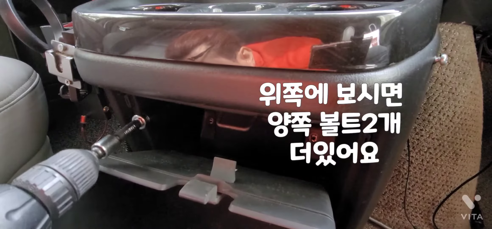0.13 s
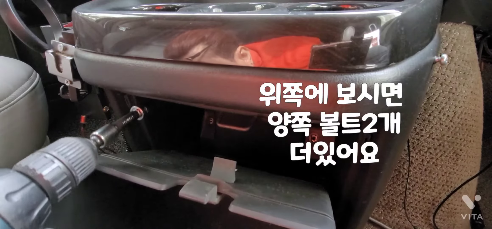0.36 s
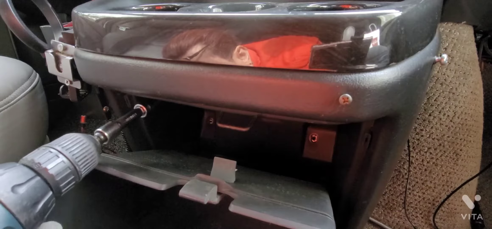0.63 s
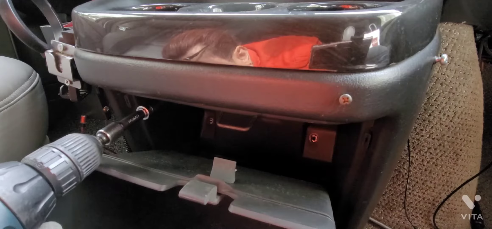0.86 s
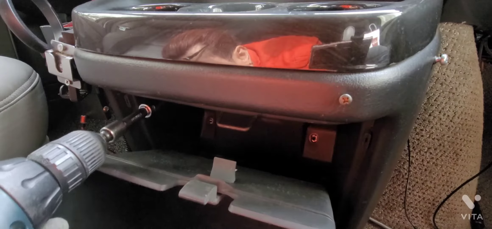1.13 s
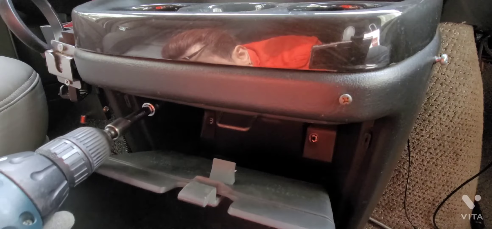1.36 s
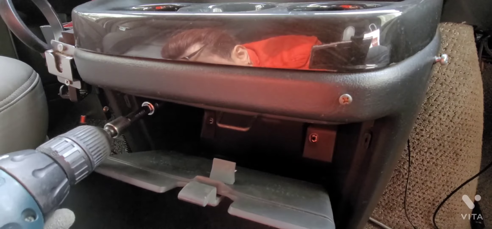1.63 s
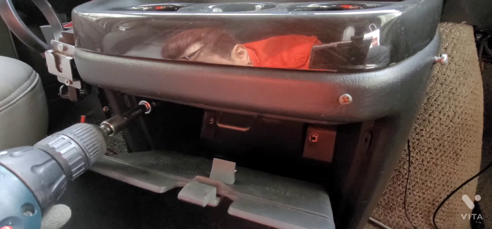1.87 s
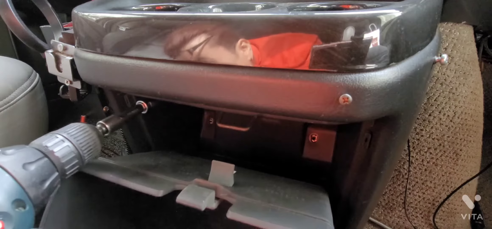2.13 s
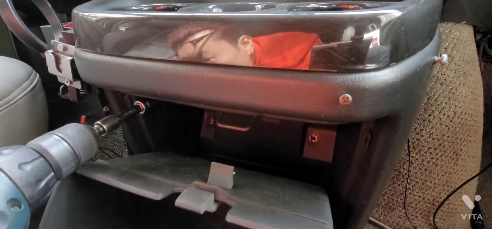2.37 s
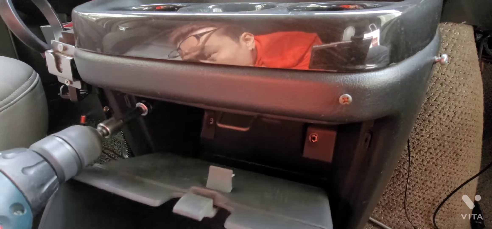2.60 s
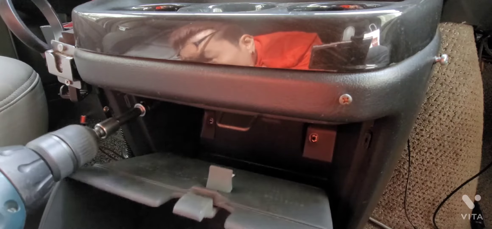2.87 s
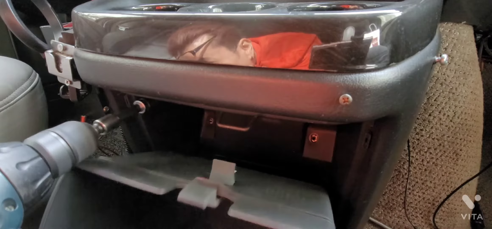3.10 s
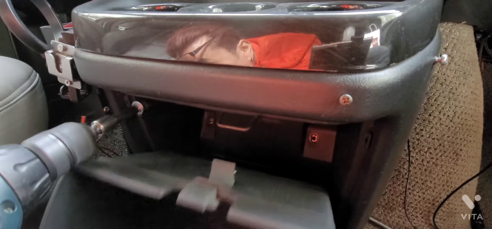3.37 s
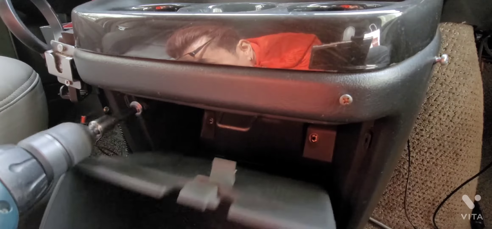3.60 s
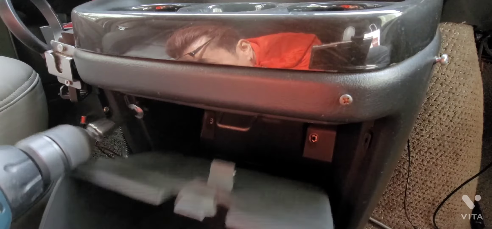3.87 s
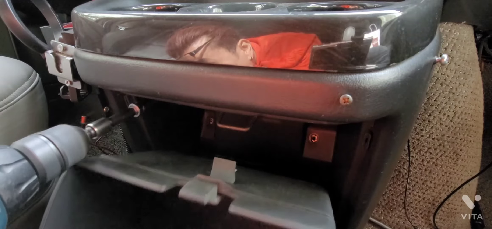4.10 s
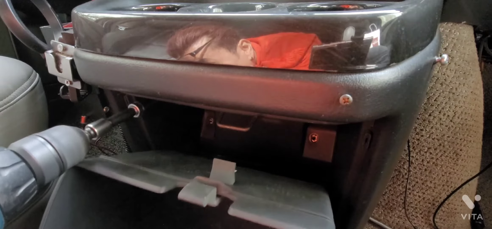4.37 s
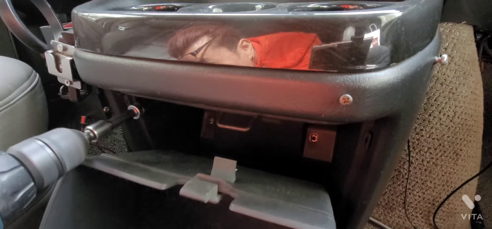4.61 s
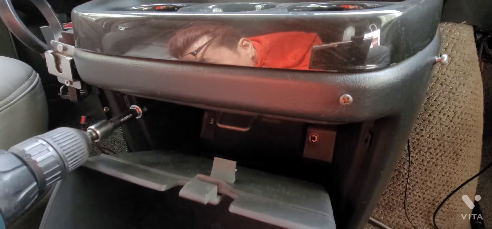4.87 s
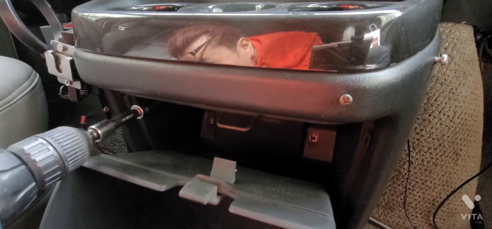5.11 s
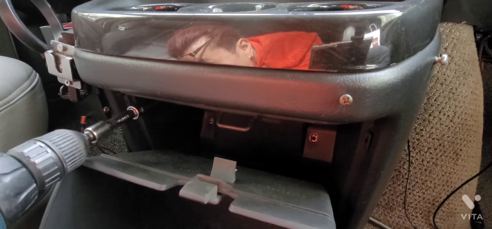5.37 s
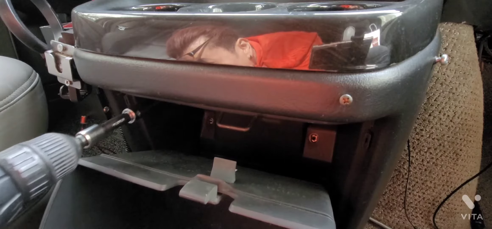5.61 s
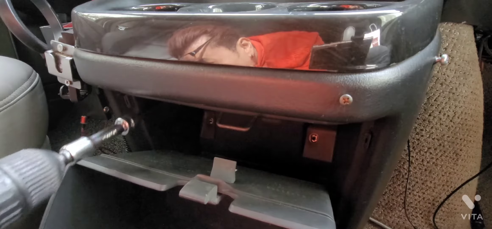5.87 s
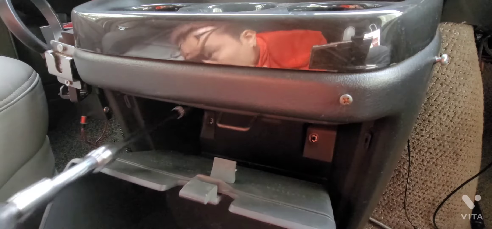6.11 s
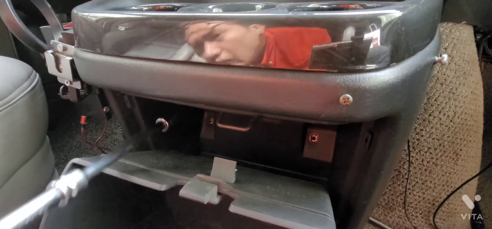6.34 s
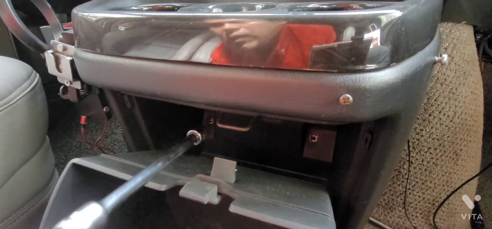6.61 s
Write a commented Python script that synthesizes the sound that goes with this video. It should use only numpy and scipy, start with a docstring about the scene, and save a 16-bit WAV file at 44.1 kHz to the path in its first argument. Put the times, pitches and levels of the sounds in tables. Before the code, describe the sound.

Close and mostly left-sided, in a small dry car footwell: hands and tool scrape and tap hollow plastic. A short drill burst and a longer one follow, with brushy motor whir, gear whine, socket rattle and dash buzz, the longer one ending in heavy bumps and a quick downward groan. Small taps, then a tight run of the loudest trim knocks, settle to a quiet wash.

```python
"""In a vehicle footwell a cordless drill backs out a bolt in two bursts, close to two microphones.
Motor whir and gear tones radiate through the air; the socket's grips on the bolt pass rotor shake
and chatter into the plastic dash, and a falling tone marks each release.
Knocks ring the dash and trim, hands and tool drag on the trim as trains of small slips,
and a wavering low hum lies under a quiet wash."""
import sys
import numpy as np
from scipy import signal
from scipy.fft import rfft, irfft
from scipy.io import wavfile
from scipy.ndimage import uniform_filter1d

SR = 44100
rng = np.random.default_rng(int(sys.argv[2]) if len(sys.argv) > 2 else 0)


def transcribe(signal):
    """Save signal, clipped to [-1, 1], as a 16-bit WAV file at the path in sys.argv[1]."""
    frames = np.atleast_2d(signal).T
    limited = np.clip(frames, -1, 1)
    pcm = np.round(limited * 32767).astype(np.int16)
    wavfile.write(sys.argv[1], SR, pcm)


def rack_gain(trim_db):
    """Turn a fader trim in dB into the linear factor to multiply a signal by."""
    fader = np.asarray(trim_db, float)
    return 10 ** (fader / 20)


N = 296780

# Motor speed before the knocks slow it: (time [s], speed [turns/s])
MOTOR_SPEED = [(2.45, 20), (2.56, 110), (2.62, 190), (2.7, 260), (2.76, 290), (2.88, 40), (3.03, 160),
               (3.1, 228), (3.2, 268), (3.3, 289), (3.45, 304), (3.6, 308), (4.08, 309), (4.15, 315),
               (4.3, 318), (4.45, 323), (4.6, 325), (4.72, 325), (4.8, 290), (4.95, 60)]
# Relative level of the fan, brush and gear whir over two trigger pulls: (time [s], level [dB])
WHIR_LEVEL = [(2.44, -56), (2.469, -33), (2.5, -34), (2.54, -25), (2.58, -25), (2.68, -24), (2.79, -28),
              (2.9, -60.5), (2.93, -47.5), (2.99, -24.5), (3.08, -26.5), (3.14, -23.5), (3.2, -27.5),
              (4.5, -28.5), (4.6, -28), (4.76, -28.5), (4.81, -26), (4.86, -38), (4.98, -73)]


def drill():
    """Superposition: airborne whir, structure-borne bolt vibration and body rumble add linearly."""
    speed = curves([MOTOR_SPEED], outside=0)[0] * (1 - snags())
    turns = 2 * np.pi * np.cumsum(speed * (1 + 0.00076 * wander(38))) / SR  # phase [rad]
    whir_db = curves([WHIR_LEVEL])[0]
    whir = rack_gain(whir_db + 1) * motor_whir(turns, speed / speed.max())
    near = whir + bolt_vibration(turns, whir_db) + brakes()
    return ports(near, 0.68, 0.000483) + ports(body_rumble(whir_db), 0.73, 0.0002)


# Spectrum of the whir: (frequency [Hz], relative density [dB per Hz])
WHIR_SPECTRUM = [(410, -45), (700, -2), (1020, -12), (1690, -3), (2530, -7), (2910, -9.5), (3270, -7.5),
                 (4890, -15.5), (8430, -13.5), (9720, -15.5), (12400, -12), (14500, -17.5), (15500, -21.5)]
# Gear tones: (multiple of motor speed [1], level against the whir at full speed [dB])
GEAR_TONES = [(5, -24), (6, -21), (7, -22), (8, -24), (10, -25), (15, -24), (18, -11), (39.6, -23)]
# Resonances of the drill's shell: (frequency [Hz], width [Hz], relative level [dB])
SHELL_MODES = [(1320, 160, -4.5), (1569, 17, -2.5), (1974, 120, 2), (2465, 87, 2.5), (3316, 160, -3.5),
               (3695, 60, -13)]


def motor_whir(turns, full):
    """Amplitude modulation: noise throbs once a turn, with tones at multiples of the rotation."""
    air = pair(rng.standard_normal(N), rng.standard_normal((2, N)), 0.43)
    # brushes and fan blades throb; gear teeth tick
    hiss = air * (1 + 0.15 * np.cos(turns)) + 0.12 * jolts(540, 3)
    whir = patchy(colour(hiss, WHIR_SPECTRUM), 2.62) * rack_gain(1.5 * wander(67))
    low_pass = signal.butter(2, 7000, fs=SR, output="sos")
    body = signal.sosfiltfilt(low_pass, whir)
    # the fan brightens the top as the speed rises
    whir = body + (0.12 + 1.34 * full ** 2) * (whir - body)
    gears = sum(rack_gain(db + 3 * wander(15)) * np.cos(k * turns) for k, db in GEAR_TONES)
    whir += full ** 5 * gears  # tones stand out only near full speed
    whir += 0.15 * evened(band(air, 71, 787))  # casing drone
    whir += 0.23 * patchy(evened(ring(hiss, SHELL_MODES)), 5.1)  # the shell rings with the gears
    return whir


# Resonances of the plastic dash: (frequency [Hz], width [Hz], relative level [dB])
DASH_MODES = [(187, 42, -12), (263, 62, -3.5), (419, 56, 2), (506.3, 77, -5), (574, 120, -8.5)]


def bolt_vibration(turns, whir_db):
    """Forced vibration: rotor unbalance drives the bolt; play in the socket chatters the dash modes."""
    steady, loose = grips(whir_db)
    drift = 0.45 * wander(45) + 0.12 * np.array([wander(20), wander(20)])
    wobble = 0.98 * turns + drift  # the bolt shakes a little under the motor speed
    shake = np.cos(wobble) * rack_gain(2.2 * wander(60))
    shake = shake + 0.25 * np.cos(2 * wobble) * rack_gain(5.4 * wander(30))
    clicks = pair(jolts(700, 2.5), jolts(700, 2.9) * [[1], [-1]], 0.98)
    chatter = evened(band(ring(clicks, DASH_MODES), 200, 990))
    return steady * evened(shake) + loose * chatter


# Grips of the socket on the bolt, share 0-1 being steady shake against chatter:
# (time [s], time held [s], level at the bite [dB], power share [1])
BOLT_GRIPS = [(2.465, 0.043, -34.5, .05), (2.519, 0.035, -20.5, 0), (2.56, 0.047, -13.5, 0.25),
              (2.603, 0.047, -13.5, 0.27), (2.675, 0.016, -13.5, 0.4), (2.744, 0.051, -23.5, 0),
              (2.86, 0.072, -44, 0.36), (2.97, 0.098, -31, 0), (3.034, 0.083, -12, 0.29),
              (3.115, 0.07, -11.5, 0.76), (3.199, 0.068, -14, 0.77), (3.268, 0.053, -11.5, 0.72),
              (3.338, 0.095, -11, 0.88), (3.445, 0.11, -15, 0.73), (3.56, 0.1, -13, .6),
              (3.69, 0.084, -14.5, 0.61), (3.818, 0.073, -12.5, 0.47), (3.946, 0.073, -16.5, .15),
              (4.085, 0.015, -16.5, 0.2), (4.119, 0.046, -27, 0.34), (4.234, .035, -19, 0.17),
              (4.33, .06, -20, 0), (4.439, 0.026, -20.5, 0.15), (4.559, 0.046, -32.5, 0.7),
              (4.68, .04, -33.5, 0.34), (4.78, 0.051, -29.5, 0)]


def grips(whir_db):
    """Energy partition: each grip bites, sags and lets go; shake and chatter share its power."""
    bite_s, sag_db_per_s, let_go_db_per_s = 0.0087, -7.5, -800.0
    slack_db = -13.5  # rattle between grips, against the whir
    since = np.arange(SR // 4) / SR
    power = np.array([np.zeros(N), rack_gain(whir_db + slack_db) ** 2])
    for s, held, db, share in BOLT_GRIPS:
        bite = np.minimum(since / bite_s, 1)
        released = np.clip(since - held, 0, 1)
        force = bite * rack_gain(db + sag_db_per_s * since + let_go_db_per_s * released)
        share = np.clip(share, 0.02, 0.98)
        add(power, s, force ** 2 * [[share], [1 - share]])
    return np.sqrt(power)


def snags():
    """Loading: each knock costs the rotor a share of its speed, won back exponentially."""
    full_scale_share, recovery_s = 0.25, 0.018  # share lost to a trim knock of 0 dB; time constant
    lost, since = np.zeros((1, N)), np.arange(SR // 4) / SR
    for s, db, *_ in KNOCK_EVENTS:
        add(lost, s, full_scale_share * rack_gain(db) * np.exp(-since / recovery_s))
    return lost[0]


# Brake groans at each release:
# (time [s], length [s], start frequency [Hz], end frequency [Hz], level [dB])
BRAKE_GROANS = [(2.753, .045, 856, 394, -21), (4.789, 0.035, 926, 494, -17)]


def brakes():
    """Frequency glide: a roughened tone falls geometrically as the rotor is caught."""
    out = np.zeros((1, N))
    for s, length, start_hz, end_hz, db in BRAKE_GROANS:
        hz = np.geomspace(start_hz, end_hz, int(length * SR))
        tone = np.sin(2 * np.pi * np.cumsum(hz) / SR) * np.hanning(len(hz))
        rough = evened(uniform_filter1d(rng.standard_normal(len(hz)), 50))
        add(out, s, rack_gain(db) * tone * (1 + 0.5 * rough))
    return out[0]


def body_rumble(whir_db):
    """Random vibration: the hand-held body rumbles in lumps, following the whir level in part."""
    level_db = -12.5 + 0.77 * whir_db + 4.5 * wander(23)
    return rack_gain(level_db) * evened(band(rng.standard_normal(N), 43, 160))


# Knocks, with a relative level for each part of the sound:
# (time [s], trim knock [dB], dash boom [dB], upper trim modes [dB], bright crack [dB])
KNOCK_EVENTS = [(0.62, -30, -23, -77, -80), (0.773, -38.5, -45.5, -57, -54.5), (1.184, -37, -34, -73, -78),
                (1.554, -30, -25.5, -49, -65), (1.573, -39, -28, -34.5, -47), (1.815, -31, -33, -58, -64),
                (1.834, -21, -39, -38, -30), (1.875, -23.5, -23, -50.5, -40), (2.134, -46, -45, -40.5, -44),
                (2.168, -21, -23, -58, -50), (2.244, -34, -56, -38, -59), (2.395, -34.5, -36.5, -32, -36.5),
                (2.943, -27.5, -49, -39.5, -51), (3.946, -26, -8, -24.5, -44),
                (4.085, -17.5, -10, -29.5, -21), (4.232, -14, -10.5, -23, -14),
                (4.33, -21.5, -12.5, -36.5, -25.5), (4.573, -18, -23.5, -31.5, -21.5),
                (5.19, -43, -47, -64, -65.5), (5.213, -36.5, -59, -72, -61),
                (5.282, -27, -32, -63.5, -50.5), (5.307, -36, -37.5, -47, -46.5),
                (5.456, -60.5, -55, -75, -86), (5.591, -46, -45, -80, -84.5),
                (5.676, -18.5, -44.5, -22.5, -51), (5.696, -31.5, -60, -31, -66),
                (5.742, -46, -56.5, -65, -67), (5.852, -17, -25.5, -27, -53),
                (5.871, -8, -23, -13.5, -26.5), (5.945, -4, -14.5, -10, -29.5),
                (6.064, -9.5, -12.5, -12, -30), (6.106, -8.5, -18.5, -13, -27),
                (6.141, -11, -16.5, -20, -64), (6.182, -18.5, -17, -43, -67),
                (6.233, -26.5, -27, -49.5, -68), (6.253, -26.5, -22.5, -65, -71)]
# Lower trim resonances: (frequency [Hz], width [Hz], relative level [dB])
TRIM_MODES = [(800, 300, 0), (1050, 350, -3), (1350, 400, -2), (1700, 400, 0), (2000, 400, -1)]
# Upper trim resonances: (frequency [Hz], width [Hz], relative level [dB])
UPPER_TRIM_MODES = [(2400, 500, 0), (2900, 550, -1), (3400, 600, -2), (4100, 700, -3), (4900, 800, -4)]
# Tail of the footwell after a knock: (60 dB decay time [s], relative level [dB])
FOOTWELL_TAIL = (0.067, 0.76)


def knocks():
    """Modal excitation: quick clusters of contacts ring dash and trim, at a new spot each time."""
    held_damping = 1.6  # the hand on the dash widens its modes
    out, t = np.zeros((2, N)), np.arange(7000) / SR
    tail_s, tail_db = FOOTWELL_TAIL
    tail = rack_gain(tail_db - 60 * t / tail_s) * (1 - np.exp(-t / 0.001))
    first = 0.33 * np.exp(-t / 0.00064)  # the first touch, at once
    for s, db, boom_db, upper_db, crack_db in KNOCK_EVENTS:
        # the weaker the upper modes against the trim, the sooner the contacts fade
        fade_s = max(0.048 - 0.0016 * np.clip(db - upper_db, 0, 35), 0.01)
        fade = rack_gain(-60 * t / fade_s) * (1 - np.exp(-t / 0.00098))  # steepened by the powers below
        noise, spot = rng.standard_normal((7, len(t))), rng.standard_normal((3, 5))
        lumps = rack_gain(7.5 * evened(uniform_filter1d(noise[6], 60)))
        contact = noise[0] * (first + fade ** 1.46 * lumps) + noise[1:3] * tail
        trim = ring(contact, struck(TRIM_MODES, spot))
        upper = ring(contact, struck(UPPER_TRIM_MODES, spot))
        dash = [(f, w * held_damping, d + 1.9 * b) for (f, w, d), b in zip(DASH_MODES, spot[0])]
        boom = ring(noise[3] * (first + fade ** 1.7) + 0.37 * noise[4:6] * tail, dash)
        crack = band(contact, 2700, 15000) + 0.26 * band(contact, 4500, 8000)
        sound = rack_gain(db + 3) * peaked(trim) + rack_gain(boom_db + 4.5) * peaked(boom)
        sound = sound + rack_gain(upper_db + 3) * peaked(upper) + rack_gain(crack_db + 6) * peaked(crack)
        direction_db = np.array([[1], [-1]]) * 0.5 * spot[2, 0]
        add(out, s, sound * rack_gain(direction_db))
    return ports(band(out, 190, 16000), 0.54, 0.00027)


def struck(modes, spot):
    """Modal participation: the striking point shifts each mode's frequency and level."""
    return [(f * (1 + 0.04 * a), w, d + 1.5 * b) for (f, w, d), a, b in zip(modes, *spot[:2])]


# Hands and tool dragging on trim, with relative levels:
# (time [s], length [s], dull rub [dB], bright rustle [dB], low push [dB])
DRAGS = [(0.0, 0.028, -42, -66.5, -68), (0.12, 0.087, -64, -78, -45), (0.641, .05, -45, -67, -37.5),
         (0.686, 0.071, -51, -70, -42), (0.769, 0.077, -58, -62, -35), (0.988, .14, -51.5, -72.5, -66),
         (1.18, 0.15, -33, -61, -32), (1.37, 0.19, -43.5, -69, -52), (1.452, 0.1, -35, -71, -41.5),
         (1.582, 0.037, -55, -68, -31.5), (1.881, 0.055, -43.5, -62, -21.5), (2.048, 0.36, -51.5, -54, -42),
         (2.164, 0.063, -57, -60, -26), (2.247, 0.21, -45, -62, -38), (2.749, 0.15, -60, -70, -23),
         (4.062, .08, -60, -70, -19.5), (4.209, .09, -60, -72.5, -18.5), (4.424, 0.14, -60, -69, -20.5),
         (5.173, 0.12, -51, -61.5, -36.5), (5.279, 0.092, -31, -53.5, -29.5),
         (5.626, 0.076, -46.5, -56, -44), (5.671, 0.093, -50, -56, -61.5), (5.877, 0.13, -42, -47.5, -58.5),
         (5.949, 0.074, -31.5, -48.5, -47.5), (6.042, 0.042, -50.5, -50, -45.5),
         (6.213, 0.064, -31.5, -71, -58.5), (6.367, 0.77, -76, -70.5, -68)]
# Resonances of the bright rustle: (frequency [Hz], width [Hz], relative level [dB])
RUSTLE_MODES = [(1150, 53, -3.5), (1480, 170, -1.5), (1900, 250, -4), (3240, 500, -3.5), (3930, 660, -10),
                (4900, 660, -8.5), (8000, 3100, -14)]
# Faint fidgeting that never stops, relative levels: (dull rub [dB], bright rustle [dB], low push [dB])
FIDGETING = (-64.5, -77.5, -60)


def rubs():
    """Stick-slip friction: dense small slips, dull in the dash and bright in air, with panel pushes."""
    rise, fall = 0.19, 0.49  # shares of a drag's length
    power = rack_gain(np.array(FIDGETING)[:, None] + 2.5 * wander(9.7)) ** 2
    for s, length, *layers_db in DRAGS:
        done = np.arange(0, 1, 1 / (length * SR))
        swell = np.minimum(1, np.minimum(done / rise, (1 - done) / fall)) ** 2
        add(power, s, (rack_gain(np.array(layers_db))[:, None] * swell) ** 2)
    dull_gain, bright_gain, push_gain = np.sqrt(power)
    dull = evened(ring(jolts(1500, 2.1), DASH_MODES))
    slips = pair(evened(jolts(4400, 3)), rng.standard_normal((2, N)), 0.39)
    bright = evened(ring(slips, RUSTLE_MODES))
    push = evened(band(rng.standard_normal(N), 43, 200))
    drag = rack_gain(-4.5) * dull_gain * dull + rack_gain(2.5) * bright_gain * bright
    return ports(drag + rack_gain(-6.5) * push_gain * push, 0.43, 0.00034)


# Spectrum of the quiet wash: (frequency [Hz], relative density [dB per Hz])
WASH_SPECTRUM = [(50, -34), (85, -2), (191, -2.5), (238, 4.5), (664, -3.5), (882, -14), (1490, -17.5),
                 (1740, -30), (1850, -16), (2570, -31), (15800, -40.5)]
# The low hum and the deep rumble under it: (hum frequency [Hz], rumble level [dB])
HUM_AND_RUMBLE = (57.2, -56)
# Level of the hum: (time [s], level [dB])
HUM_COURSE = [(0, -47), (1, -47), (2.2, -49), (5.2, -50), (6.73, -51.5)]


def still_air():
    """Diffuse-field coherence: the wash is alike left and right in the bass; the low hum wavers."""
    shared, own = rng.standard_normal(N), rng.standard_normal((2, N))
    high_pass = signal.butter(1, 300, "high", fs=SR, output="sos")
    wash = colour(shared + 2.5 * signal.sosfilt(high_pass, own), WASH_SPECTRUM)
    hum_hz, deep_db = HUM_AND_RUMBLE
    hum = np.sqrt(2) * np.sin(2 * np.pi * np.cumsum(hum_hz * (1 + 0.05 * wander(12))) / SR)
    hum_db = curves([HUM_COURSE])[0] + 1.2 * wander(9)
    deep = evened(band(pair(shared, own, 0.93), 25, 92))
    return rack_gain(-62) * wash + rack_gain(hum_db) * hum + rack_gain(deep_db) * deep


# Left over right at the microphones, before each source takes its share:
# (frequency [Hz], level difference [dB])
LEFT_RIGHT_DIFFERENCE = [(60, -2), (110, 6.5), (200, 2.5), (380, 15), (700, 10), (1290, 8), (2380, -0.5),
                         (4400, 9.5), (8120, 11.5), (15000, 4.5)]


def ports(x, share, lag_s):
    """Level and time differences: nearer the left microphone, mostly louder there and earlier."""
    hz = np.fft.rfftfreq(N, 1 / SR)
    half = rack_gain(share * read(LEFT_RIGHT_DIFFERENCE, hz) / 2)
    return irfft(rfft(x) * [half, np.exp(-2j * np.pi * hz * lag_s) / half], N)


def pair(shared, own, same):
    """Partial coherence: two microphones hear one sound, part of it by different reflections."""
    same = np.clip(same, 0, 1)
    return same * shared + np.sqrt(1 - same ** 2) * own


def patchy(x, db):
    """Time-frequency modulation: level varies at random in small patches of time and frequency."""
    z = signal.stft(x, nperseg=512)[2]
    field = rng.standard_normal(z.shape[1:])
    field = uniform_filter1d(field, size=5, axis=0)
    field = evened(uniform_filter1d(field, size=6, axis=1))
    return signal.istft(z * rack_gain(db * field), nperseg=512)[1][:, :N]


def ring(x, modes):
    """Modal superposition: two-pole resonances (Hz, width, dB) add with alternate signs."""
    out = 0
    for k, (hz, width, db) in enumerate(modes):
        r = np.exp(-np.pi * width / SR)
        angle = 2 * np.pi * hz / SR
        gain = (-1) ** k * rack_gain(db) * np.sqrt(1 - r) * np.sin(angle)
        out = out + gain * signal.lfilter([1], [1, -2 * r * np.cos(angle), r * r], x)
    return out


def jolts(per_s, spread_db):
    """Poisson-like impulses: random clicks of uneven size."""
    size = rack_gain(spread_db * np.minimum(rng.exponential(1, N), 4))
    return rng.standard_normal(N) * size * (rng.random(N) < per_s / SR)


def wander(hz):
    """Low-pass random process: twice-smoothed noise, rms 1."""
    size = max(int(SR / hz), 2)
    return evened(uniform_filter1d(uniform_filter1d(rng.standard_normal(N), size), size))


def colour(x, points):
    """Spectral shaping: filters by a spectrum table, rms 1."""
    gain = rack_gain(read(points, np.fft.rfftfreq(x.shape[-1], 1 / SR)))
    return evened(irfft(rfft(x) * gain, x.shape[-1]))


def band(x, lo_hz, hi_hz):
    """Band limitation: a steep Butterworth band-pass."""
    return signal.sosfilt(signal.butter(3, [lo_hz, hi_hz], "band", fs=SR, output="sos"), x)


def evened(x):
    """Power normalization: scales to rms 1."""
    return x / np.sqrt(np.mean(x ** 2) + 1e-20)


def peaked(x):
    """Peak normalization: scales the largest excursion to 1."""
    return x / abs(x).max()


def read(points, hz):
    """Logarithmic frequency scale: interpolates a spectrum table."""
    f, value = np.transpose(points)
    return np.interp(np.log(hz + 1), np.log(f + 1), value)


def curves(tables, outside=-120):
    """Linear interpolation: joins tables in time and gives each column at every sample."""
    rows = np.concatenate(tables)
    s = np.maximum.accumulate(rows[:, 0])
    return [np.interp(np.arange(N) / SR, s, c, outside, outside) for c in rows[:, 1:].T]


def add(mix, s, sound):
    """Superposition: mixes a sound in at time s."""
    part = mix[:, round(s * SR):][:, :sound.shape[-1]]
    part += sound[..., :part.shape[1]]


def scene():
    """Superposition of all sources in the footwell."""
    return drill() + knocks() + rubs() + still_air()


def roll_off(x):
    """The treble ends steeply here."""
    return signal.sosfilt(signal.butter(12, 16780, fs=SR, output="sos"), x)


def record(dry):
    """Saturation and band limitation: peaks round off near full scale, then the top is cut."""
    rounded = 1.007 * np.tanh(dry / 0.84)
    low_pass = signal.firwin(255, 15950, fs=SR)  # edge [Hz]
    limited = signal.oaconvolve(rounded, low_pass[None], "same")
    return roll_off(limited)


dry = scene()
out = record(dry)
transcribe(out)
```